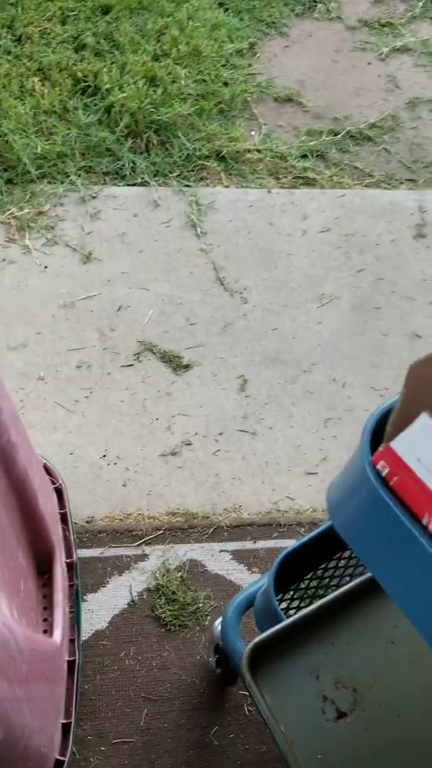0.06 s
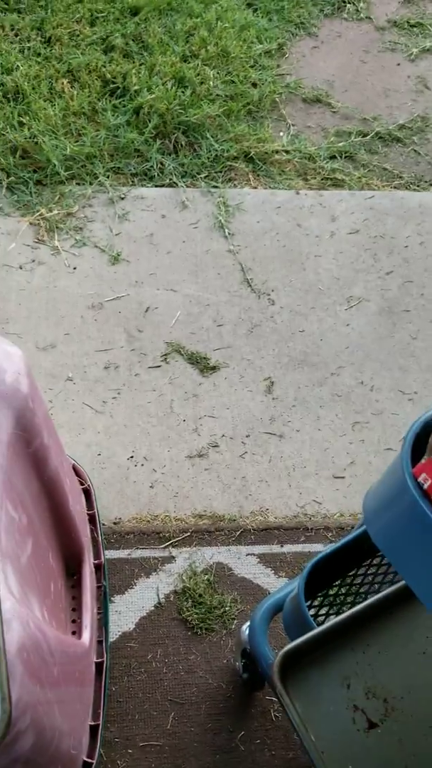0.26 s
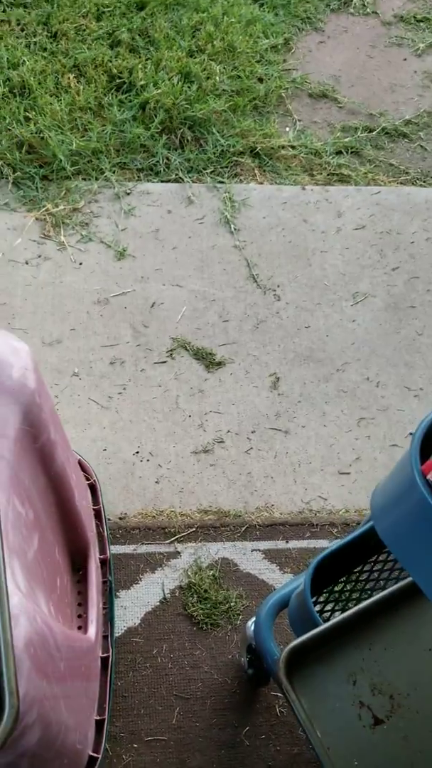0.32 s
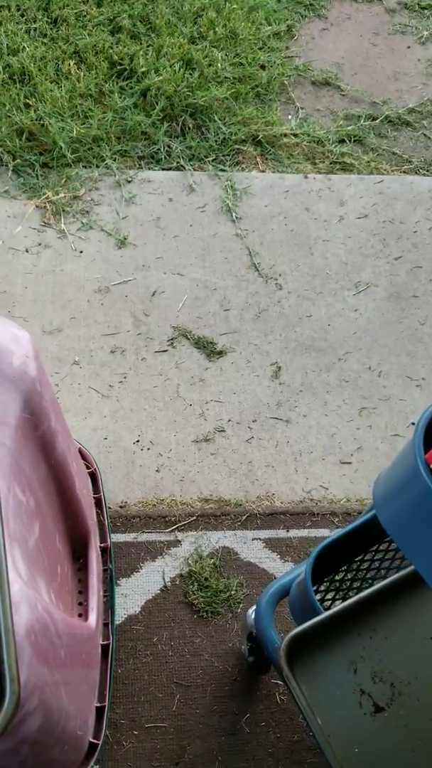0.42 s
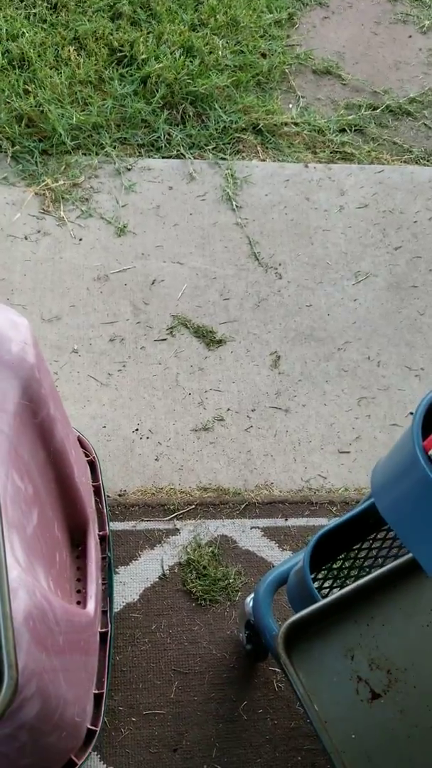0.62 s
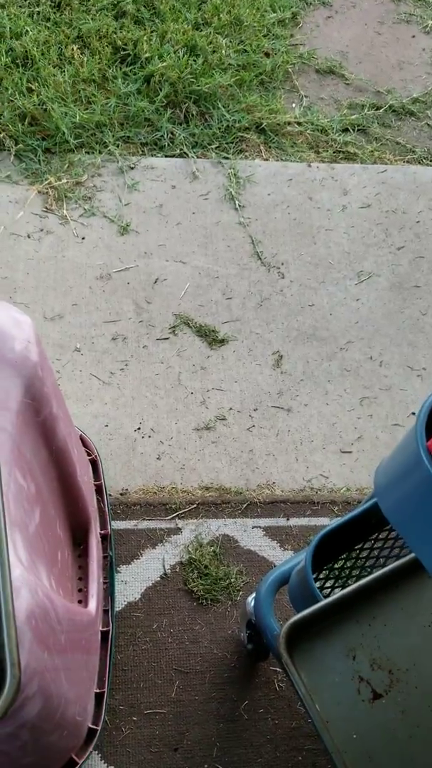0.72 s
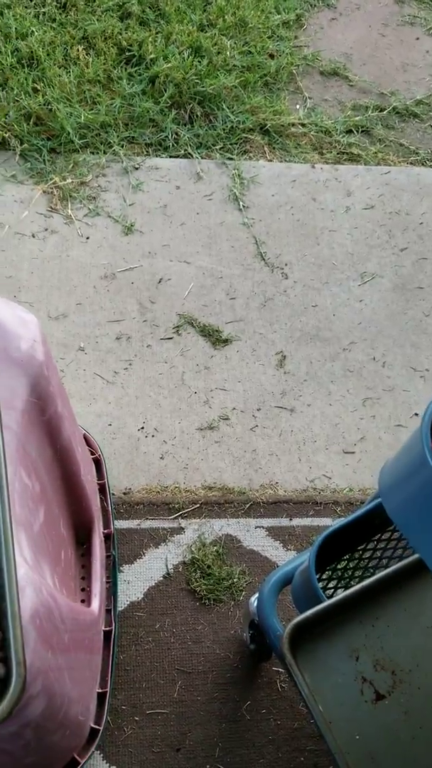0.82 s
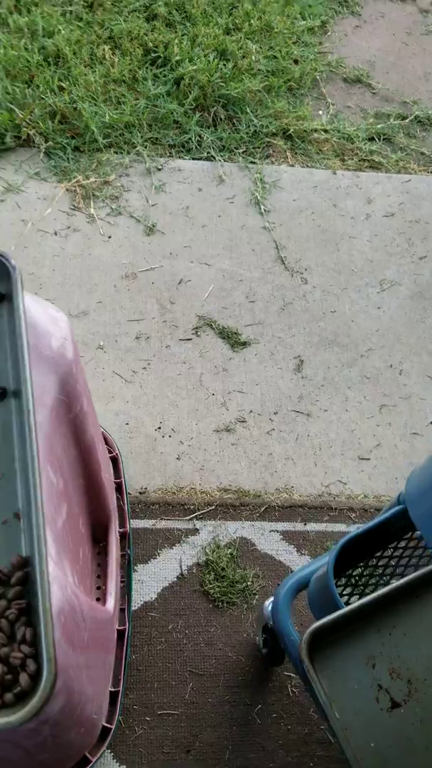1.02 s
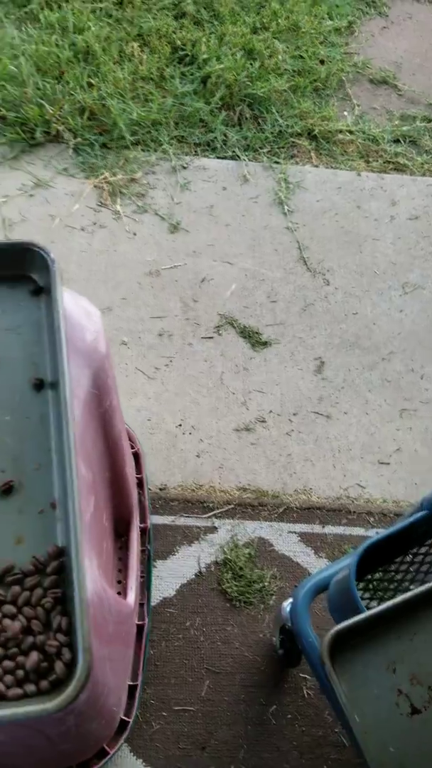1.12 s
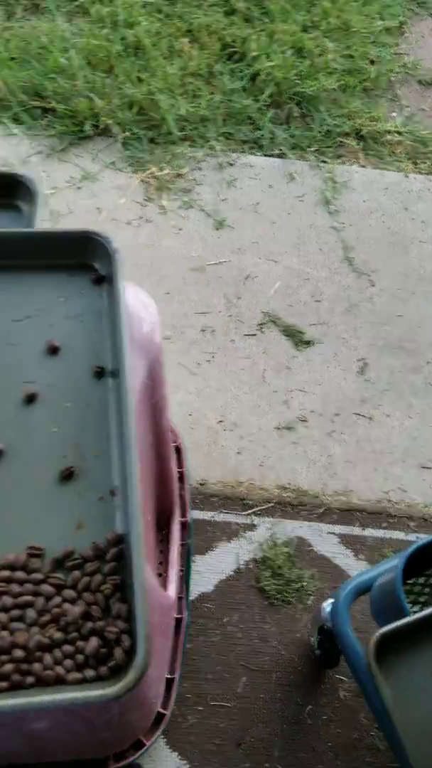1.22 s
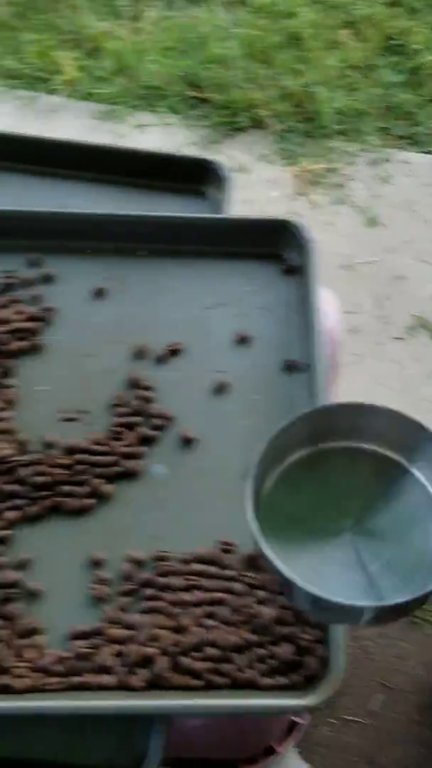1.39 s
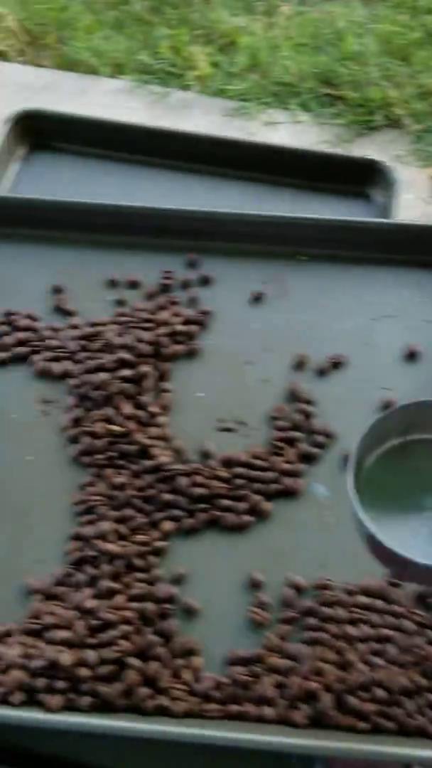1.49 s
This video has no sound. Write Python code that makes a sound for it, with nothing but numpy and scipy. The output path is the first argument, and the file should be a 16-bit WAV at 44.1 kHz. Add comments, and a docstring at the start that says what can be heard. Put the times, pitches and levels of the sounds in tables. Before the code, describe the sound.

Coffee beans rush down onto a metal baking tray and settle, close by outdoors.

```python
"""A steady hiss, a slowly beating motor hum and a faint rustle of shifting beans come first, outdoors.
Then coffee beans are tipped onto a metal baking tray, close by and to the left: a few land and bounce,
and the whole batch rushes down and comes to rest. Each hit is a tick and a crack that sets the metal
ringing; thousands of hits blur into the rush. Behind them the hiss and the hum grow fainter."""
import sys
import numpy as np
from scipy import signal
from scipy.fft import rfft, irfft
from scipy.io import wavfile
from scipy.ndimage import uniform_filter1d

SR = 44100
rng = np.random.default_rng(int(sys.argv[2]) if len(sys.argv) > 2 else 0)


def materialize(psi):
    """Save the field psi as 16-bit PCM at rate SR to the path in sys.argv[1].

    A 1-D psi becomes a single channel; in a 2-D psi each row is a channel.
    """
    bounded = np.clip(np.atleast_2d(psi).T, -1, 1)
    quanta = np.round(bounded * 32767).astype(np.int16)
    wavfile.write(sys.argv[1], SR, quanta)


N = 68355

# loudness of the hiss, which the motor's overtones also follow (time [s], level [dB])
HISS_LEVEL = [(0, -34.5), (.24, -33.5), (.6, -43.5), (.9, -42), (1.1, -43.5), (1.33, -43), (1.55, -43)]
# how much louder the beans are on the left (frequency [Hz], left minus right [dB])
TRAY_BALANCE = [(100, 1.3), (240, 7.6), (600, 7.6), (1000, 3.8), (2000, 6.7), (4200, 6.5), (6500, 5.8),
                (9000, 3.5), (12500, 2), (15500, 6.6)]


def amp(db):
    """Turns decibels into a number to multiply a sound by."""
    return 10 ** (np.asarray(db) / 20)


def evened(x):
    """Scales a sound to an average (rms) level of 1."""
    return x / np.sqrt(np.mean(x ** 2) + 1e-20)


def read(points, hz):
    """Looks up a frequency table, sliding between its rows on a log scale."""
    row_hz, value = np.transpose(points)
    return np.interp(np.log(hz + 1), np.log(row_hz + 1), value)


def curve(points):
    """Looks up a time table at every sample."""
    return np.interp(np.arange(N) / SR, *np.transpose(points))


def add(mix, start_s, sound):
    """Mixes a stereo sound in at the given time."""
    part = mix[:, round(start_s * SR):][:, :sound.shape[1]]
    part += sound[:, :part.shape[1]]


def colour(x, spectrum, balance, size=4096):
    """Gives a sound its tone and left-right balance, with a filter that never rings ahead of a hit."""
    hz = np.fft.rfftfreq(size, 1 / SR)
    log_gain = np.log(amp(read(spectrum, hz) + np.array([[.5], [-.5]]) * read(balance, hz)))
    mirrored = np.hstack([log_gain, log_gain[:, -2:0:-1]])
    taps = np.fft.ifft(np.exp(np.conj(signal.hilbert(mirrored)))).real
    return signal.fftconvolve(x, taps, axes=1)[:, :N]


def pair(x, likeness):
    """Makes left and right alike at each frequency: 1 is the same, 0 is unrelated."""
    left, right = rfft(x)
    same = np.clip(read(likeness, np.fft.rfftfreq(x.shape[1], 1 / SR)), -1, 1)
    return irfft(np.array([left, same * left + np.sqrt(1 - same ** 2) * right]), x.shape[1])


def wander(count):
    """A smooth drift through count random values over the scene."""
    return evened(signal.resample(rng.standard_normal(count), N))


def background(flutter_db=.5):
    """Outdoor noise: a slightly fluttering hiss over a fading low rumble."""
    # tone of the hiss and of the rumble (frequency [Hz], level [dB])
    hiss_tone = [(20, 7), (60, -16.5), (160, -8.5), (300, -1), (520, -3.5), (830, -6), (1200, -1),
                 (1500, -3), (2400, -1.5), (2900, 0.5), (3800, 3), (5200, -2), (7500, -7), (11000, -12.5),
                 (15800, -24.5)]
    rumble_tone = [(20, -22), (45, -10), (70, 0), (170, -3), (400, -14.5), (1200, -26), (5000, -57)]
    # how alike the two sides are (frequency [Hz], likeness [-1 to 1])
    likeness = [(60, 0.95), (180, 0.82), (550, 0.64), (1650, -0.2), (4970, 0.0073), (15000, 0.0027)]
    # a slight lean to the left (frequency [Hz], left minus right [dB])
    balance = [(60, 1.2), (240, 2.2), (950, 3), (3770, 0.98), (15000, 0.0)]
    # loudness of the rumble (time [s], level [dB])
    rumble_level = [(0, -51.5), (.2, -51), (.29, -52.5), (.4, -55), (.8, -62.5), (1.55, -81)]
    hiss = evened(colour(pair(rng.standard_normal((2, N)), likeness), hiss_tone, balance))
    rumble = evened(colour(pair(rng.standard_normal((2, N)), likeness), rumble_tone, balance))
    hiss_db = curve(HISS_LEVEL) + flutter_db * wander(count=70)
    return amp(hiss_db) * hiss + amp(curve(rumble_level)) * rumble


def motor(hum_hz=117.45, waver=.0029, beat_depth=.74, overtones_db=-18, sway_db=5.5, drift_hz=3):
    """A motor hums: its lowest note beats (swells and dips) while the overtones above it waver."""
    # loudness of the lowest note, before the beating (time [s], level [dB])
    hum_level = [(0, -42), (.1, -42.5), (.32, -48.5), (.55, -54), (.8, -54.5), (1.2, -61.5), (1.55, -61.5)]
    # unevenly spaced moments when that note nearly cancels (time [s])
    dip_times = [-0.0045, 0.173, 0.46, 0.684, 0.86, 1.09, 1.377, 1.55]
    # the overtones (frequency [times the lowest note], relative level [dB])
    overtones = [(2, -5), (3, -7.5), (4, -8), (5.13, -6.5), (8, -12.5), (9.95, -3.5)]
    cycles = np.cumsum(hum_hz * (1 + waver * wander(count=14))) / SR
    beats = np.interp(np.arange(N) / SR, np.sort(dip_times), np.arange(len(dip_times)))
    low = np.sin(2 * np.pi * cycles) * (1 - beat_depth * np.cos(2 * np.pi * beats))
    high = np.zeros(N)
    for multiple, db in overtones:
        gain = amp(db + sway_db * wander(count=20))
        drift = np.cumsum(drift_hz * wander(count=30)) / SR
        high += gain * np.sin(2 * np.pi * (multiple * cycles + drift))
    return amp(curve(hum_level)) * low + np.sqrt(2) * amp(curve(HISS_LEVEL) + overtones_db) * high


def bean_hit(wash_stretch, crack_fade_s, crack_db, notes_db=-19.5, tick_db=-12, size=16384):
    """One bean hits the tray: a tick, a short crack, ringing notes and a noisy wash of weaker ones."""
    # notes the metal rings at (frequency [Hz], relative level [dB], time to fade 60 dB [s])
    tray_notes = [(377, 1.5, 0.46), (728, -7.5, 0.11), (1170, 3.5, .3), (1496, 4, 0.14), (1720, -3, 1),
                  (1900, -8, 0.26), (2101, -2, 0.29), (2297, 2.5, 0.15), (2340, -8.5, 0.12),
                  (2880, 4.5, 0.15), (3155, -1, 0.34), (3597, -6, 0.18), (4110, -4, .15), (4330, -5, 0.35),
                  (4696, -3, 0.15), (4936, -1, 0.19)]
    # how long the wash lasts before stretching (frequency [Hz], time to fade 60 dB [s])
    wash_fade = [(200, 0.1), (1500, 0.32), (4000, .15), (8000, 0.087), (15000, 0.046)]
    # how alike the tray sounds on both sides (frequency [Hz], likeness [0 to 1])
    likeness = [(150, 0.53), (500, 1), (1200, 0.066), (3000, 0.00014), (15000, 0)]
    t = np.arange(size) / SR
    hz, frame_s, bands = signal.stft(rng.standard_normal((2, size)), SR, nperseg=256)
    fade_s = wash_stretch * read(wash_fade, hz)[:, None]
    wash = signal.istft(bands * amp(-60 * frame_s / fade_s), SR, nperseg=256)[1][:, :size]
    crack = rng.standard_normal((2, size)) * amp(-60 * t / crack_fade_s)
    hit = evened(wash) + amp(crack_db) * evened(crack)
    for note_hz, db, ring_s in tray_notes:
        note = np.sin(2 * np.pi * (note_hz * t + rng.random((2, 1))))
        hit += amp(notes_db + db) * evened(amp(-60 * t / ring_s) * note)
    hit /= np.sqrt(size)
    hit[0, 0] += amp(tick_db)
    hit[1, rng.integers(3, 14)] += amp(tick_db) / 2  # the tick reaches the right later and softer
    return pair(hit, likeness)


def rattle(hits_per_s, spots=12, spread_db=3):
    """Random hits of uneven strength on many spots of the tray, at a steady overall loudness."""
    chance = hits_per_s / SR * np.ones(N)
    lands = rng.random(N) < chance
    strength = amp(spread_db * np.minimum(rng.exponential(1, N), 3.5))
    hits = lands * strength / np.sqrt(chance) * rng.choice([-1, 1], N)
    local_power = abs(uniform_filter1d(hits ** 2, size=1300))
    hits /= np.sqrt(local_power + .05 * np.mean(hits ** 2))  # evens out clumps and gaps
    spot = rng.integers(0, spots, N)
    out = np.zeros((2, N))
    for k in range(spots):
        hit = bean_hit(wash_stretch=1, crack_fade_s=.066, crack_db=-5.5)
        out += signal.fftconvolve((hits * (spot == k))[None], hit, axes=1)[:, :N]
    return out


def shifting_beans():
    """Beans start to slide before they fall, making a faint, fine rustle."""
    # tone of the rustle (frequency [Hz], boost [dB])
    rustle_tone = [(100, -8), (600, -2), (1200, -1), (2400, 6), (2900, 9.5), (4200, -3), (7000, 8.5),
                   (11500, -5), (15500, 3)]
    # loudness of the rustle (time [s], level [dB])
    rustle_level = [(0, -40.5), (.1, -40), (.23, -43), (.4, -55), (.55, -93)]
    return amp(curve(rustle_level)) * evened(colour(rattle(hits_per_s=3000), rustle_tone, TRAY_BALANCE))


def first_beans(level_db=16, bounce_s=.0105, bounce_db=-9.5):
    """Single beans land and bounce once each; the tray rings longer while it is empty."""
    # each bean's landing (time [s], relative level [dB])
    landings = [(.2458, -4), (.2909, -6), (.3162, -8), (.3282, -8.5)]
    # tone of a landing (frequency [Hz], boost [dB])
    landing_tone = [(60, -26), (200, -19), (400, -11.5), (800, -8), (1500, 0.5), (3000, 0), (5000, 6.5),
                    (6000, 2), (7500, 2.5), (11000, -5.5), (14000, -2.5), (16000, 0.5)]
    out = np.zeros((2, N))
    for start_s, db in landings:
        for delay_s, drop_db in (0, 0), (bounce_s, bounce_db):
            hit = bean_hit(wash_stretch=1.85, crack_fade_s=.024, crack_db=-4)
            add(out, start_s + delay_s, amp(level_db + db + drop_db) * hit)
    return colour(out, landing_tone, TRAY_BALANCE)


def hollow_ring(beans, width_hz=110, level_db=-7):
    """A hollow tone glides through the pour: one narrow, moving band of the beans' own sound."""
    # the middle of that band (time [s], frequency [Hz])
    glide = [(.33, 3650), (.41, 3780), (.47, 4050), (.505, 3900), (.535, 3300), (.58, 2700), (.68, 2350)]
    spin = np.exp(2j * np.pi * np.cumsum(curve(glide)) / SR)
    decay = np.exp(-np.pi * width_hz / SR)
    band = signal.lfilter([1 - decay], [1, -decay], beans / spin)  # move the band to 0 Hz and smooth
    return amp(level_db) * 2 * (spin * band).real


def rush(start_s=.329, full_hits_per_s=2200, thinning=.6, treble_hz=9300):
    """The batch pours down; the hits thin out and grow duller as the beans settle."""
    # how strongly the beans pour (time [s], level [dB])
    flow = [(.33, -19.5), (.39, -15), (.48, -12), (.53, -14), (.61, -16), (.68, -21), (.75, -27.5),
            (.81, -36.5), (.88, -39.5), (1.05, -51.5)]
    # tone of the rush (frequency [Hz], boost [dB])
    rush_tone = [(60, -50), (200, -16), (450, -14), (750, -8), (950, -7.5), (1400, -2), (2600, -1.5),
                 (3400, 1), (4600, 4.5), (6200, 2.5), (7600, 3.5), (10300, -5), (13500, -1.5), (16000, 0)]
    # treble: bright on bare metal, duller as beans pile up and slow down (time [s], boost [dB])
    treble_boost = [(.33, 6.5), (.39, 2.5), (.47, -.5), (.6, 0.5), (.75, -3), (.87, -4)]
    flow_db = curve(flow)
    below_peak_db = np.maximum(flow_db - flow_db.max(), -25)
    hits_per_s = full_hits_per_s * amp(thinning * below_peak_db)
    beans = colour(rattle(hits_per_s), rush_tone, TRAY_BALANCE)
    beans = evened(beans + hollow_ring(beans))
    body = signal.sosfiltfilt(signal.butter(2, treble_hz, fs=SR, output="sos"), beans)
    treble = amp(curve(treble_boost)) * (beans - body)
    started = np.arange(N) > start_s * SR
    return started * amp(flow_db) * (body + treble)


def scene():
    """Beans on the tray, in front of the outdoor noise and the motor."""
    lean_left = amp([[.8], [-.8]])
    return first_beans() + rush() + shifting_beans() + background() + motor() * lean_left


def record(dry, ceiling=.9, top_hz=15850):
    """The microphones colour the sound; tall peaks are rounded off and the highest treble is cut."""
    # tone of the microphones (frequency [Hz], boost [dB])
    mic_tone = [(20, -22), (55, 0), (7600, 0.5), (8350, -3), (9300, 1), (10800, 6), (12200, 6), (13500, 5),
                (15500, -1)]
    mic_gain = amp(read(mic_tone, np.fft.rfftfreq(2 * N, 1 / SR)))
    heard = irfft(rfft(dry, 2 * N) * mic_gain)[:, :N]
    rounded = heard / (1 + (heard / ceiling) ** 6) ** (1 / 6)
    treble_cut = signal.firwin(511, top_hz, window=("kaiser", 9), fs=SR)
    return signal.oaconvolve(rounded, treble_cut[None], "same")


dry = scene()
out = record(dry)
materialize(out)
```